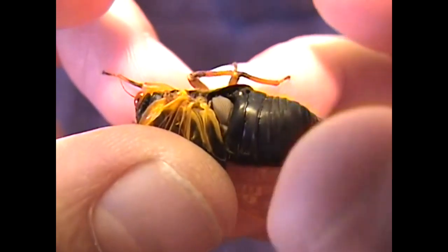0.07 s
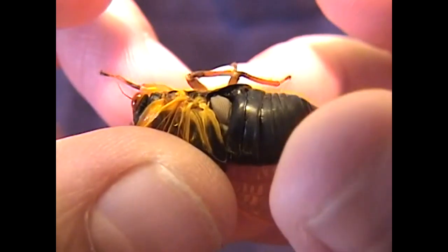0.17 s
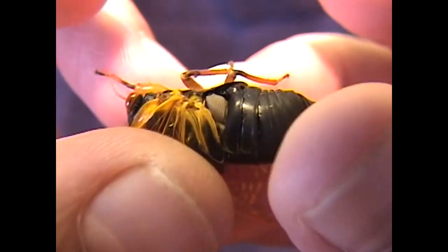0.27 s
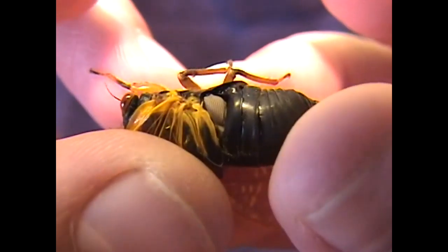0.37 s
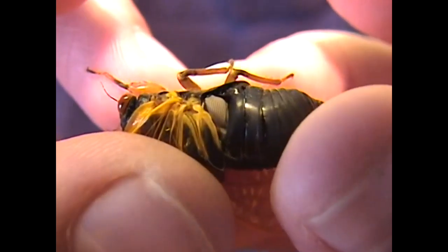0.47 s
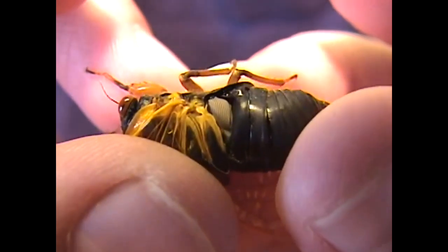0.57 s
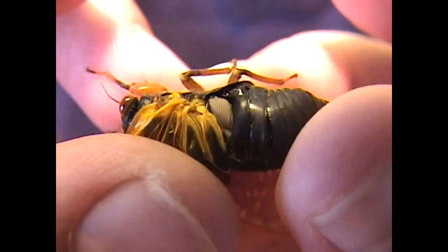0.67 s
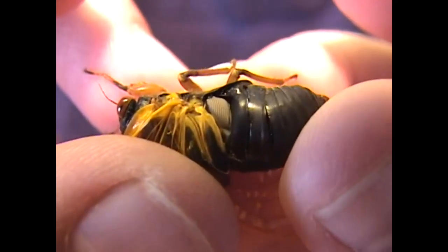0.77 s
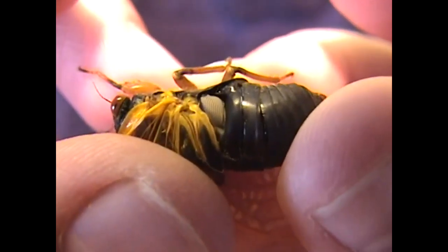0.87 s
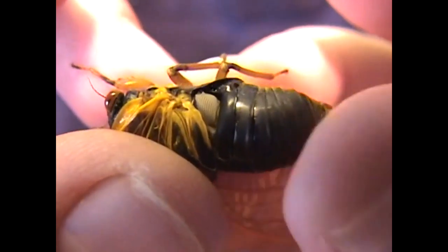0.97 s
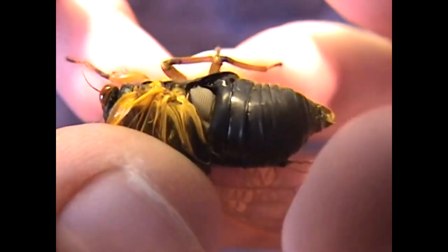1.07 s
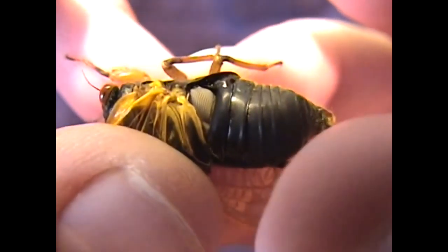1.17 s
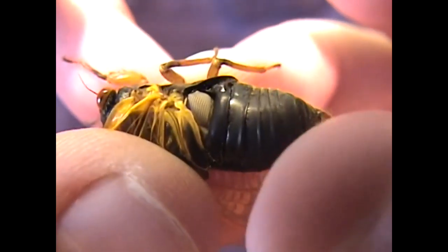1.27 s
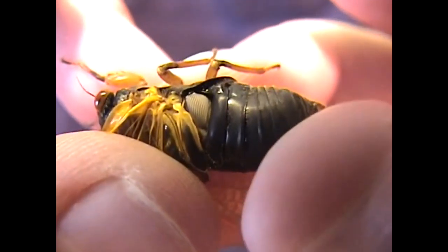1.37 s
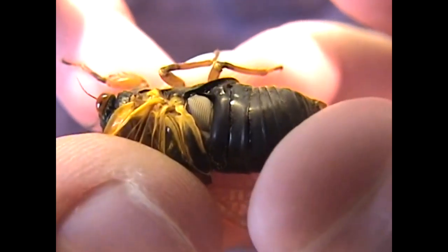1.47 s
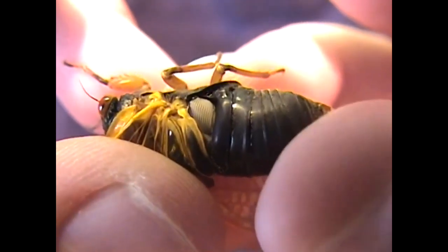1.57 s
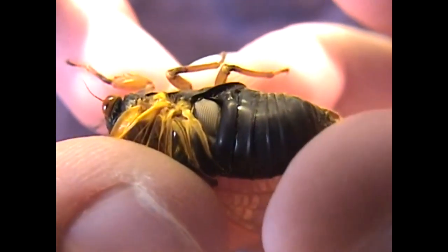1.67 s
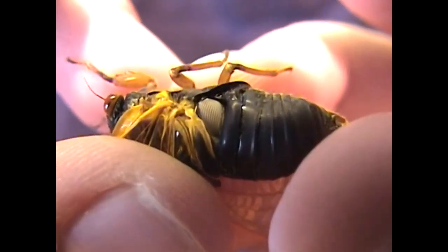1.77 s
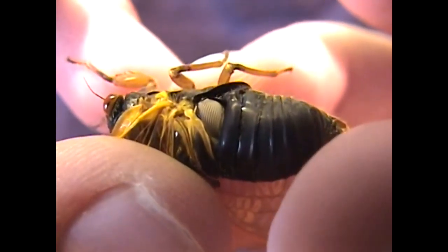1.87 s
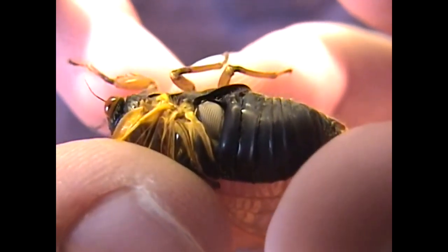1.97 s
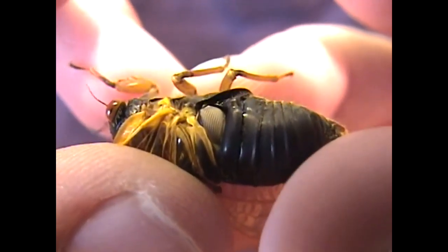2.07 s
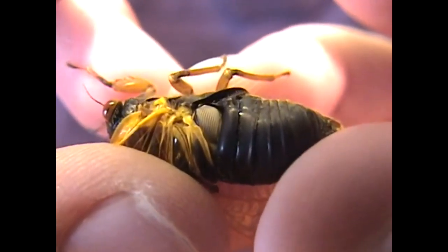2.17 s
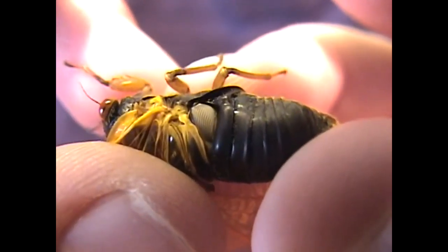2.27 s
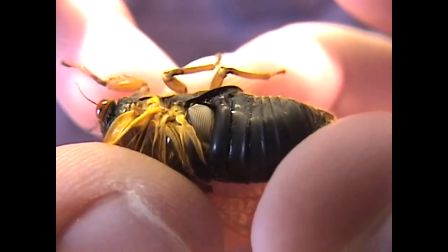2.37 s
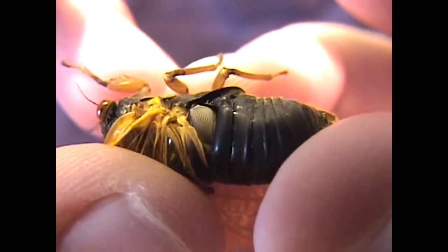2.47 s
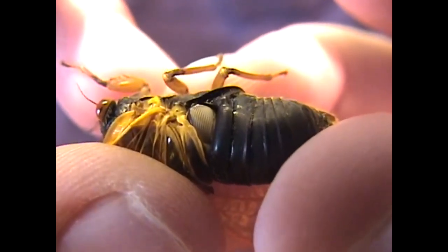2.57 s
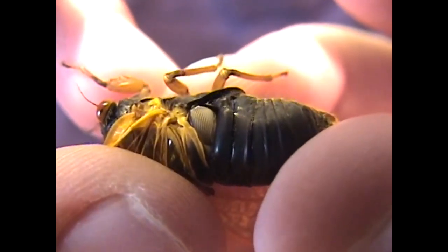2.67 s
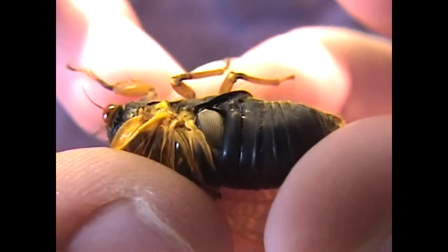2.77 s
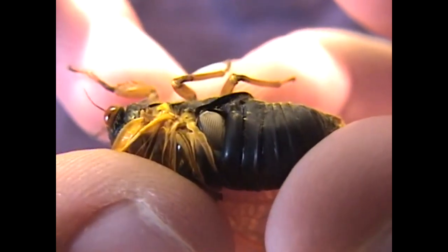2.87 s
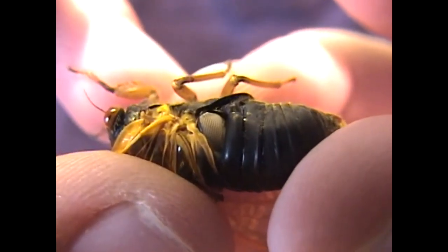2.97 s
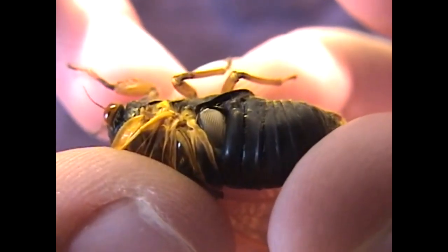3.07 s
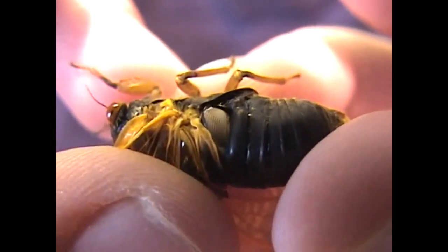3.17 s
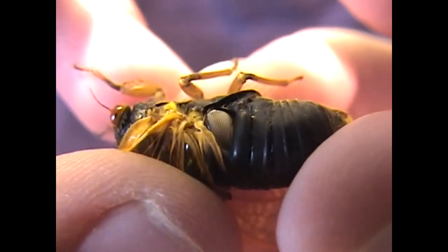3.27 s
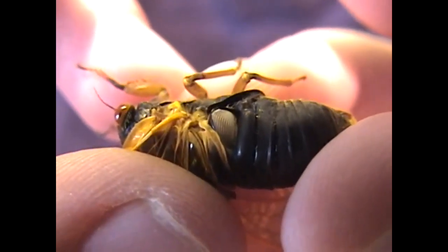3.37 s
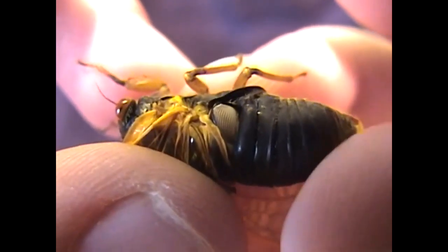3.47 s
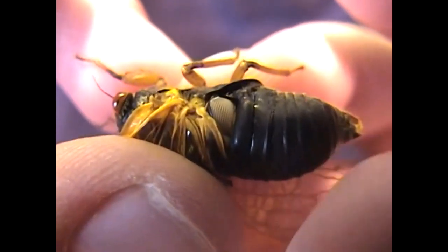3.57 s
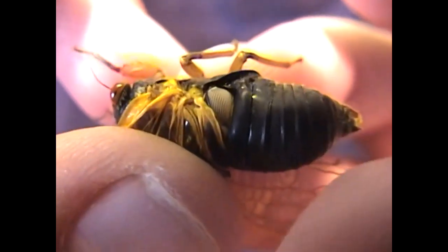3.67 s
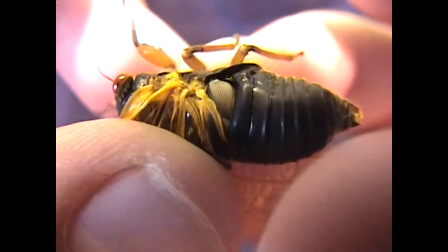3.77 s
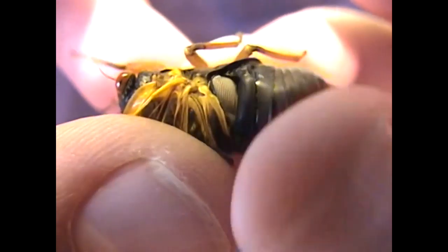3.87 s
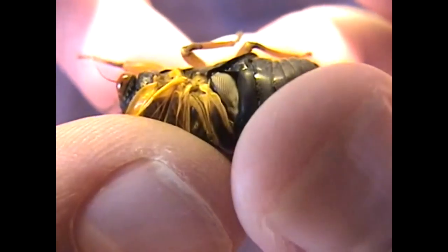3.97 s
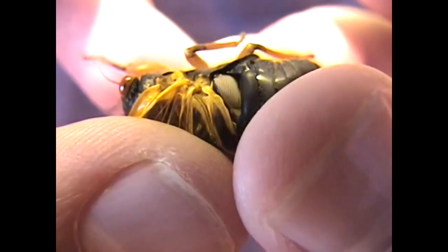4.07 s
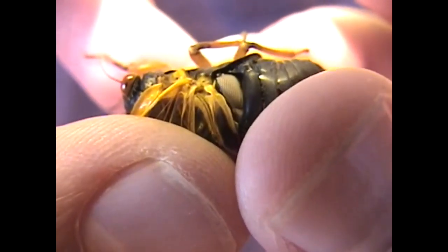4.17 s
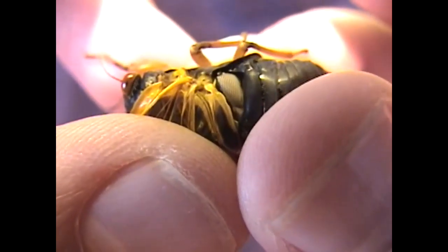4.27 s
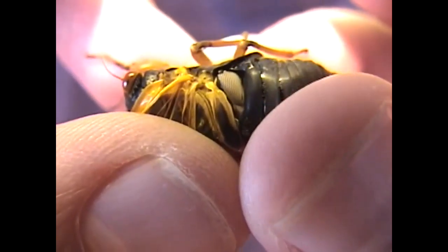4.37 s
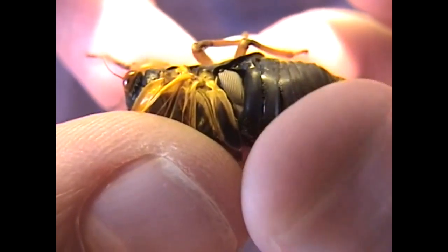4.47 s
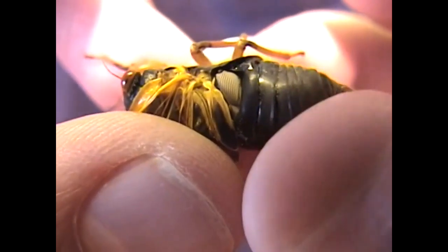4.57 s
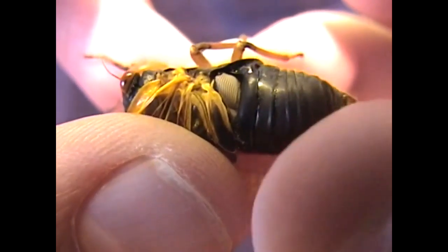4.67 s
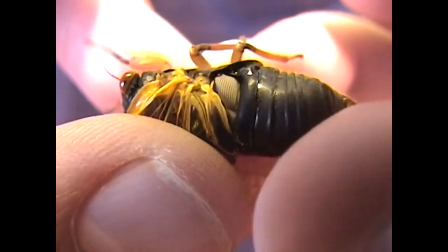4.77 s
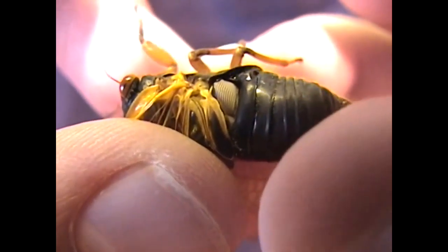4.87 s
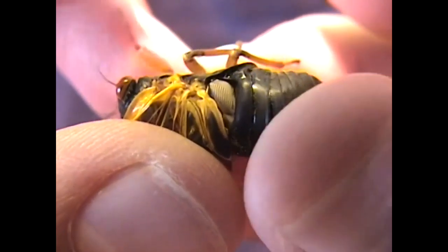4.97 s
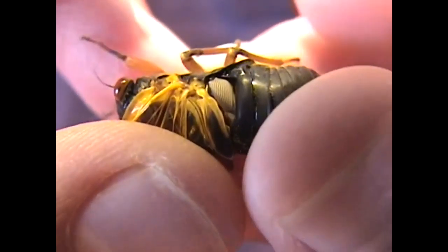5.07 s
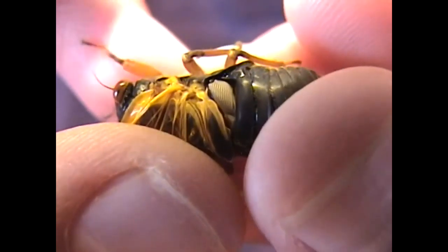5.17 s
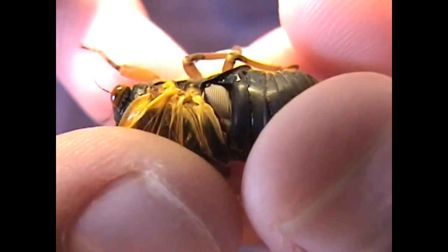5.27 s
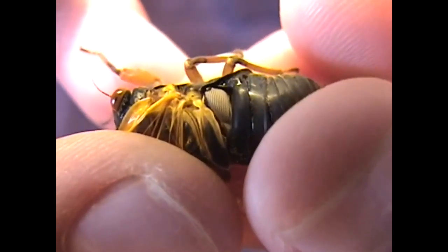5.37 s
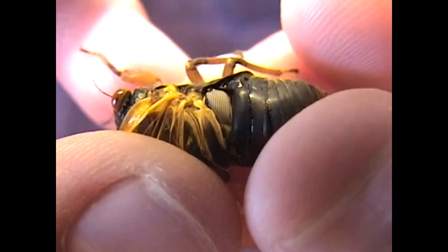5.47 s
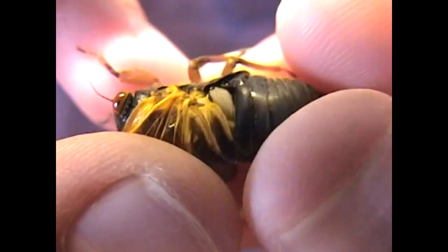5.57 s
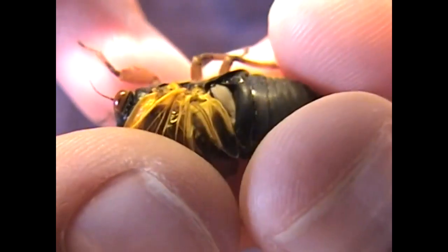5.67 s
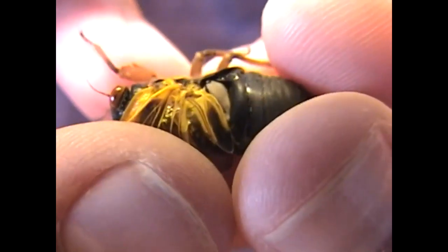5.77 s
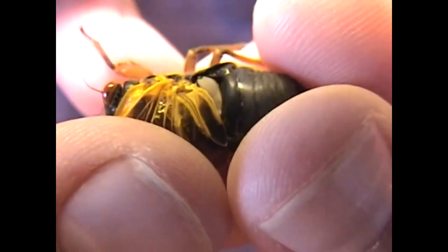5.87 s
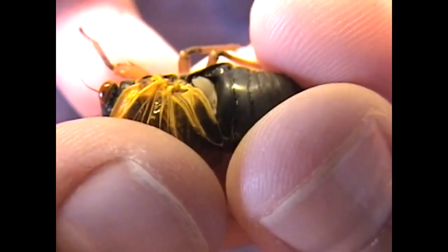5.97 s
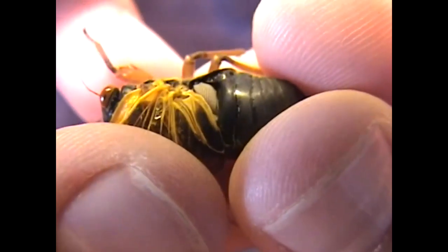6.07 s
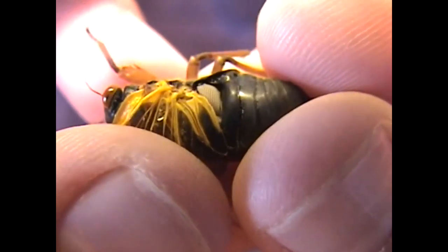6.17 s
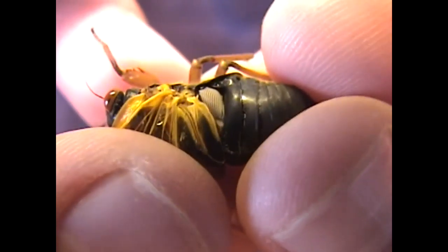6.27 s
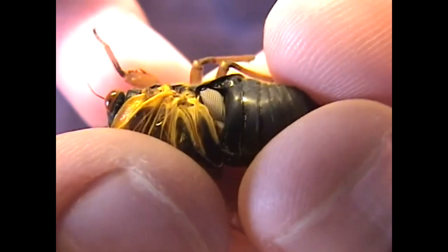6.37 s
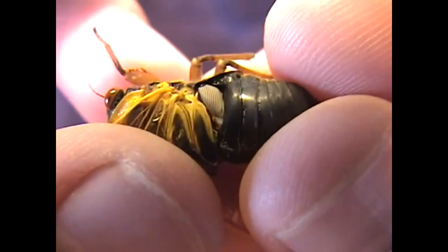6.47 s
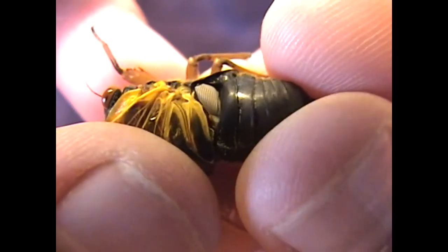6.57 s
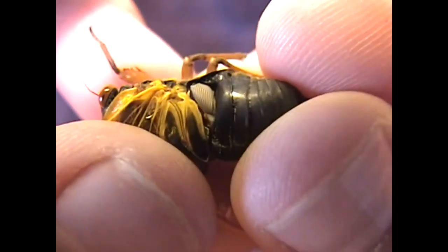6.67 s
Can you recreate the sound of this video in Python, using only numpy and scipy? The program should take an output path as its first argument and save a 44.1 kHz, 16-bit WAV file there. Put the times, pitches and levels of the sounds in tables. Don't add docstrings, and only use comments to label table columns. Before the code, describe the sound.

Outdoors, a cicada is held in fingers very near a stereo microphone. Throughout, a faint chorus of far cicadas continues: a flickering high hiss and a wavering mid-pitched hum, over soft air rumble and a weak low machine drone. Tiny bright dry ticks of legs and wings on skin cluster at the start; one tiny snapping buzz comes at 0.44 s and a sharper tick at 0.78. Faint falling calls and birdlike chirps glide by between 0.7 and 2.3 s. After a quiet stretch, loud raspy buzzes erupt at 3.86-4.24, two longer then shorter stutters, like a bent tin lid popping rapidly. The far hiss swells briefly near 4.2. Three clipped rasps follow at 4.94-5.08, then a denser, brighter run from 5.53 to 6.02, ending with the longest buzz. Brief rattles at 6.21 and 6.40-6.46 leave the chorus, its hum rising slightly, until 6.7 s.

```python
import sys
import numpy as np
from scipy import signal
from scipy.io import wavfile
from scipy.ndimage import uniform_filter1d

SR = 44100
rng = np.random.default_rng(int(sys.argv[2]) if len(sys.argv) > 2 else 0)


def to_wav(sig):
    pcm = np.clip(np.atleast_2d(sig), -1, 1) * 32767
    pcm = np.round(pcm).astype(np.int16)
    wavfile.write(sys.argv[1], SR, pcm.T)


def volts_from_db(level):
    exponent = np.asarray(level, float) / 20
    return 10 ** exponent


N = 297234


def rms_one(x):
    return x / np.sqrt(np.mean(x ** 2) + 1e-20)


def at_hz(points, hz):
    points = np.array(points)
    return np.interp(np.log(hz), np.log(points[:, 0]), points[:, 1])


def drift(rate):
    r = np.exp(-80 * np.pi * rate / SR)
    chance = rng.standard_normal(N // 40 + 2002)
    slow = signal.lfilter([1], [1, -2 * r, r * r], chance)[2000:]
    return np.interp(np.arange(N) / 40, np.arange(len(slow)), rms_one(slow - slow.mean()))


def resonance(x, hz, width_hz):
    r = np.exp(-np.pi * width_hz / SR)
    ring = [1, -2 * r * np.cos(2 * np.pi * hz / SR), r * r]
    return signal.lfilter(np.array([1, 0, -1]) * (1 - r * r) / 2, ring, x)


def band(x, order, low_hz, high_hz):
    return signal.sosfilt(signal.butter(order, [low_hz, high_hz], "band", fs=SR, output="sos"), x)


def add(out, at_s, size, hz, t60):
    t = np.arange(300) / SR
    rings = size[:, None] * np.sin(2 * np.pi * hz[:, None] * t) * volts_from_db(-60 * t / t60)
    places = (at_s[:, None] * SR).astype(int) + np.arange(300)
    np.add.at(out, np.clip(places, 0, N - 1), rings)


# f/Hz, likeness [-1 to 1]
LIKENESS = [(60, 0.48), (130, 0.61), (290, 0.59), (640, 0.22), (1410, 0.41), (3100, 0.63), (6820, 0.26),
            (15000, -0.27)]
# f/Hz, level/dB
LEAN = [(60, 1), (110, -0.5), (200, -1), (380, 0.5), (700, 1.5), (1290, 7), (2380, -1.5), (4400, 6),
        (8120, 3), (15000, 0)]


def stereo(noise_pair, hz):
    alike, lean_db = np.clip(at_hz(LIKENESS, hz), -1, 1), at_hz(LEAN, hz) / 2
    left_right = np.array([[1], [-1]])
    mid, side = noise_pair
    both = np.sqrt(1 + alike) * mid + np.sqrt(1 - alike) * side * left_right
    return both * volts_from_db(lean_db * left_right)


def banded_noise(spectrum, patchy_db, speed):
    out, white = 0, rng.standard_normal((2, 2, N))
    edges = np.geomspace(spectrum[0][0], spectrum[-1][0], 21)
    for k, (low, high) in enumerate(zip(edges, edges[1:])):
        hz = np.sqrt(low * high)
        pair = band(white[k % 2], 2, low, high)
        flicker = volts_from_db(at_hz(spectrum, hz) + patchy_db * drift(speed))
        out = out + flicker * stereo(pair, hz)
    return out / np.sqrt(np.mean(out.mean(0) ** 2))


# f/Hz, level/dB per Hz
AIR = [(20, -9), (60, -4), (120, -1), (200, -3), (320, -4.5), (500, -6), (750, -6.5), (900, -2), (1050, -1),
       (1600, -5.5), (2000, -12.5), (2700, -7)]


def outdoor_air():
    return volts_from_db(-53) * banded_noise(AIR, patchy_db=2.0, speed=5.1)


# f/Hz, width f/Hz, level/dB
DRONE = [(242.7, 6, -68.5), (273.8, 6.4, -69.5)]


def drone():
    out = 0
    for hz, width_hz, db in DRONE:
        out = out + volts_from_db(db) * rms_one(resonance(rng.standard_normal(N), hz, width_hz))
    return out


# start t/s, length t/s, first f/Hz, glide f/Hz, peak level/dB
CALLS = [
    (1.15, 0.41, 1447, -260, -45),
    (1.621, 0.27, 920, -110, -53.5),
    (0.657, 0.091, 2255, 27, -60),
    (1.663, .1, 2860, 92, -54),
    (2.185, 0.059, 2870, 450, -48),
    (2.222, 0.065, 3330, -900, -49),
]


def far_calls():
    edge_db, rough_hz = -9, 22
    out, t = 0, np.arange(N) / SR
    for start, length, hz, glide_hz, db in CALLS:
        share = np.clip((t - start) / length, 0, 1)
        glide = share ** 2 if glide_hz < 0 else 1 - (1 - share) ** 2
        pitch = hz + glide_hz * glide + rough_hz * drift(58)
        swell = volts_from_db(db + edge_db * (2 * share - 1) ** 2 - 1.5 + 1.4 * drift(30))
        swell = swell * (share > 0) * (share < 1)
        out = out + swell * np.sin(2 * np.pi * np.cumsum(pitch) / SR)
    return out * volts_from_db([[2.5], [-2.5]])


# f/Hz, level/dB per Hz
HISS = [(2600, -21.5), (3400, -17), (4200, -4), (5000, -4), (5900, 4), (6600, -2.5), (7500, -13),
        (8600, -20), (11000, -32), (14500, -33), (16500, -50)]
# t/s, level/dB
SWELL = [
    (0, -35.5),
    (1.5, -38),
    (2.5, -36.5),
    (3.55, -35),
    (4.2, -29),
    (4.43, -34),
    (5.5, -36.5),
    (6.74, -37),
]


def high_chorus():
    level_db = np.interp(np.arange(N) / SR, *np.transpose(SWELL))
    return volts_from_db(level_db) * banded_noise(HISS, patchy_db=1.15, speed=38)


# t/s, hum level/dB, hum centre f/Hz
CHORUS = [
    (0.0, -46, 1320),
    (0.05, -47, 1330),
    (0.26, -48.5, 1333),
    (1.09, -45, 1370),
    (1.37, -42, 1320),
    (1.45, -44.5, 1340),
    (1.52, -44.5, 1318),
    (4.41, -45, 1268),
    (6.65, -41.5, 1310),
    (6.74, -40.5, 1290),
]


def low_chorus():
    s, hum_db, centre_hz = np.transpose(CHORUS)
    t = np.arange(N) / SR
    hum_db, centre_hz = np.interp(t, s, hum_db), np.interp(t, s, centre_hz)
    pair, out = rng.standard_normal((2, N)), 0
    for hz in (1240, 1310, 1380):
        near = volts_from_db(-4 * ((centre_hz - hz) / 70) ** 2 + 2.3 * drift(1.2))
        out = out + near * resonance(pair, hz, 59)
    out = stereo(band(out, 3, 1120, 1480), 1340)
    strength = np.sqrt(uniform_filter1d(out.mean(0) ** 2, size=SR // 3))
    return volts_from_db(hum_db) * out / strength


# t/s, peak level/dB, f/Hz
TICKS = [(0.0074, -31, 9600), (0.0128, -27, 12300), (0.028, -29, 10400), (0.137, -34, 9600),
         (0.2506, -34, 9970), (0.3826, -32, 9100), (0.782, -18.5, 12800), (0.7895, -28, 9160),
         (0.9612, -34, 13000), (0.965, -36, 13200), (1.1407, -37, 9030), (1.1767, -39, 9100),
         (1.3556, -36, 9320), (1.9715, -36, 9280), (2.1071, -32, 8800), (2.5681, -37, 9030),
         (4.3754, -42, 9120), (4.5451, -30.5, 12600), (6.6762, -36, 9500)]


def ticks():
    out = np.zeros((2, N))
    s, db, hz = np.transpose(TICKS)
    s = s + 0.0011
    pan_db = 6 * rng.standard_normal(len(s))
    for side, channel in zip((.5, -.5), out):
        add(channel, s, volts_from_db(db + 3.5 + side * pan_db), hz, .0015)
        add(channel, s + 0.00081, volts_from_db(db - 0.5 + side * pan_db), hz * 0.8, .002)
        add(channel, s, volts_from_db(db - 9), hz * 0.25, .004)
        add(channel, s, volts_from_db(db - 24), hz * 0.039, .02)
    return out


# f/Hz, width f/Hz, level/dB
BODY = [(3990, 1280, -1.5), (5670, 1460, -6), (6600, 7800, 2.5)]


def body_shell(main, sac):
    shaped = sac
    for hz, width_hz, db in BODY:
        shaped = shaped + volts_from_db(db + 6.0) * resonance(main, hz, width_hz)
    shaped = signal.sosfilt(signal.butter(4, 7300, fs=SR, output="sos"), shaped)
    shaped = signal.sosfilt(signal.cheby2(6, 32, 2600, "high", fs=SR, output="sos"), shaped)
    leak = volts_from_db(-1.5) * band(main, 3, 250, 2200)
    return (shaped + leak) * volts_from_db([[.5], [-.5]])


# start t/s, length t/s, level/dB, air sac opening [0-1]
BUZZES = [(0.4374, 0.013, -24.5, .3), (3.8584, 0.08, -26, 1), (3.951, 0.078, -24, 0.87),
          (4.0349, 0.04, -25.5, 0.93), (4.091, .037, -25.5, 1.02), (4.153, 0.029, -24, 0.94),
          (4.236, .007, -25, 0.72), (4.9355, .028, -22, 0.3), (4.976, 0.027, -23.5, 0.06),
          (5.0639, .020, -23, 0.35), (5.5343, 0.066, -24, 0.06), (5.6306, .024, -23, 0),
          (5.676, .027, -24.5, 0.27), (5.705, 0.078, -24, 0.1), (5.804, 0.072, -23.5, 0.4),
          (5.8938, 0.13, -24.5, 0.48), (6.210, .014, -23.5, 0.26), (6.398, 0.027, -25, 0.14),
          (6.438, 0.027, -25.5, 0.28)]
# first rib f/Hz, level/dB, upper ring level/dB
DRUMS = [(6550, 0.1, -9), (6050, -1, 1)]


def buzz():
    ribs, rib_gap_s, uneven_s, spring_back_s = 8, .00076, .00035, .0066
    main, sac, crack = np.zeros((3, N))
    upper, sheen = np.zeros((2, 2, N))
    rib, bout, end = np.arange(ribs), 0, -1
    for start, length, level_db, opening in BUZZES:
        rest_s = start - end
        stroke_s = .0057 * (1 - .23 * min(rest_s / 3, 1))
        rested = rest_s > spring_back_s
        bout = start if rest_s > .3 else bout
        end = start + length
        ring_db = -12 + 4 * min((start - bout) / 0.33, 1)
        last_hz = 4230 - 1180 * opening
        low_db = -12 + 11 * opening
        middle_db = -23 + 29.5 * np.sqrt(max(opening, 0))
        last = end - (ribs + 1) * rib_gap_s
        count = 1 + round(max(last - start, 0) / stroke_s)
        chance = rng.standard_normal((30, 5, ribs))
        for k, begin in enumerate(np.linspace(start, last, count)):
            first_hz, drum_db, drum_ring_db = DRUMS[k % 2]
            late, detune, strength, flip, slant = chance[k]
            uneven = uneven_s * late[0] * (0 < k < count - 1)
            at = begin + uneven + rib_gap_s * rib + .00005 * late
            hz = last_hz + (first_hz - last_hz) * (1 - rib / (ribs - 1)) ** 1.085 + 110 * detune
            cold_db = 4 * (k == 0) * (rib == 0)
            rib_db = 5.0 - 0.23 * (rib - 2.2) ** 2 + 0.24 * strength
            size = volts_from_db(level_db + drum_db + rib_db + cold_db)
            add(main, at, size, hz, .0045)
            add(sac, at, size * volts_from_db(low_db + 0.69 * rib), 3450 + 200 * slant, .007)
            add(sac, at, size * volts_from_db(middle_db + 0.24 * rib), 4900 + 120 * flip, .009)
            plate_db = ring_db + drum_ring_db + 4.5 + 1.17 * rib + 1.8 * cold_db
            plate, plate_hz = size * np.sign(flip) * volts_from_db(plate_db), 8800 + 350 * flip
            add(upper[0], at, plate * volts_from_db(1.5 + 2.1 * slant), plate_hz, .004)
            add(upper[1], at + .000012, plate * volts_from_db(6.5 - 1.2 * slant), plate_hz, .004)
            left = size * volts_from_db(-11.5 + 1.3 * late + 1.9 * cold_db)
            right = np.sign(detune) * size * volts_from_db(-10.5 + 2.2 * late + 0.63 * cold_db)
            add(sheen[0], at, left, 12100 + 600 * slant, .002)
            add(sheen[1], at, right, 12100 + 600 * flip, .002)
            back = at + spring_back_s
            add(main, back, size * volts_from_db(-12.0 + .5 * middle_db), hz[::-1] * 1.14, .003)
            for channel in upper:
                add(channel, back, plate[::-1] * volts_from_db(-26), 8700 + 500 * detune, .003)
        add(crack, np.array([start + 0.00017]), rested * volts_from_db([level_db + 13.5]), np.array([9000]), .0004)
    sheen = band(sheen, 2, 11200, 14600)
    upper = band(upper, 3, 7900, 10000)
    return body_shell(main, sac) + crack * [[1], [.4]] + upper + sheen


def scene():
    background = outdoor_air() + drone() + far_calls()
    choruses = high_chorus() + low_chorus()
    return background + choruses + ticks() + buzz()


def roll_off(x):
    return signal.sosfilt(signal.butter(12, 16640, fs=SR, output="sos"), x)


def record(dry):
    t, peak_db = np.arange(N) / SR, 20 * np.log10(np.abs(dry).max(0) + 1e-9)
    held_db = np.maximum.accumulate(peak_db + 70 * t) - 70 * t
    lag = np.exp(-1 / (0.0001 * SR))
    gain = volts_from_db(signal.lfilter([1 - lag], [1, -lag], -.6 * np.clip(held_db + 7, 0, 6.5)))
    since_loud_s = t - np.maximum.accumulate(np.where(peak_db > -12, t, -1))
    thump = band(np.exp(-since_loud_s / .05), 2, 8, 300)
    limited = dry * gain + thump * volts_from_db([[-47], [-33]])
    mix = signal.sosfilt(signal.cheby2(10, 60, 16700, fs=SR, output="sos"), limited)
    return roll_off(mix)


dry = scene()
out = record(dry)
to_wav(out)
```